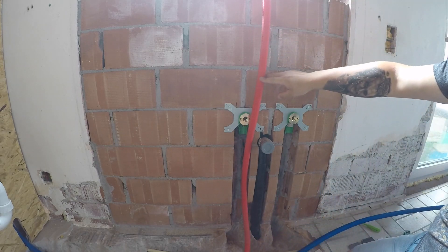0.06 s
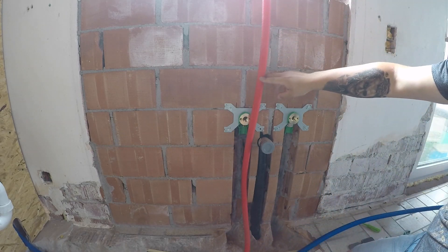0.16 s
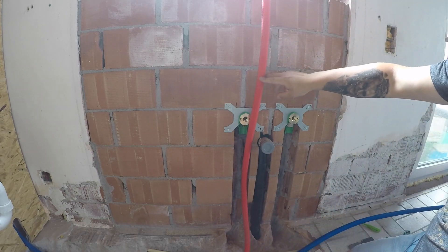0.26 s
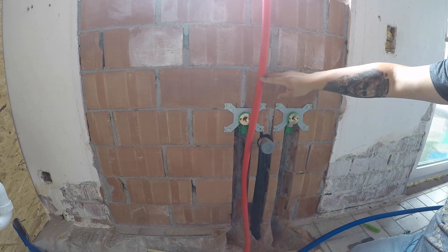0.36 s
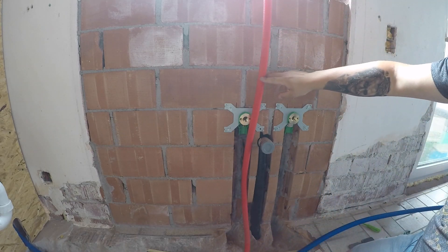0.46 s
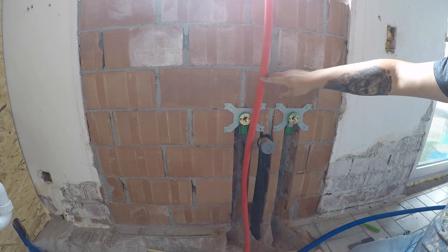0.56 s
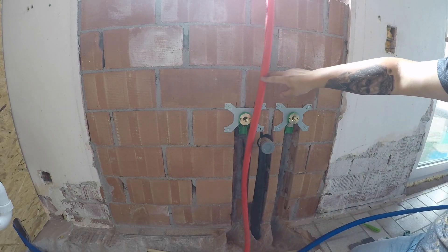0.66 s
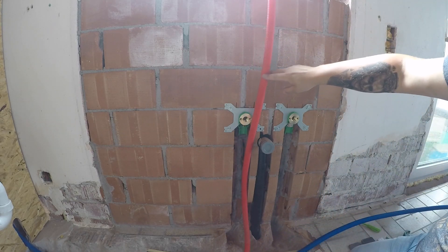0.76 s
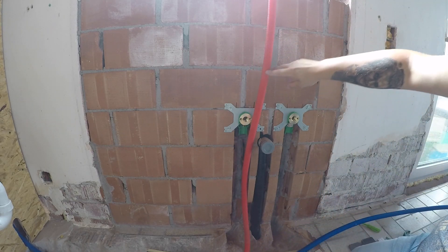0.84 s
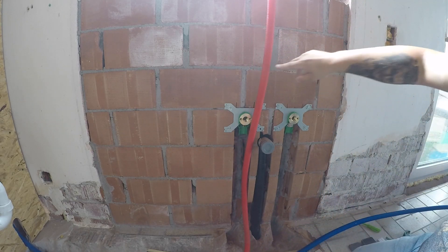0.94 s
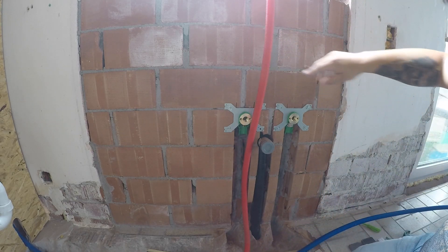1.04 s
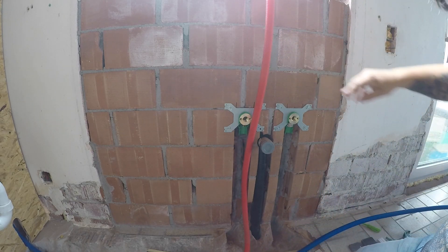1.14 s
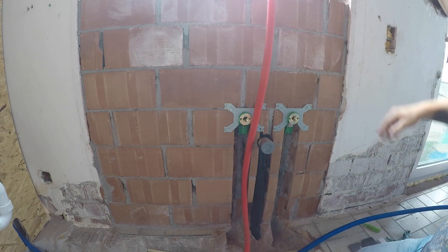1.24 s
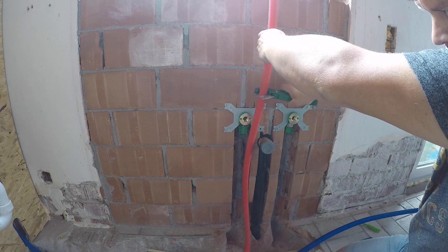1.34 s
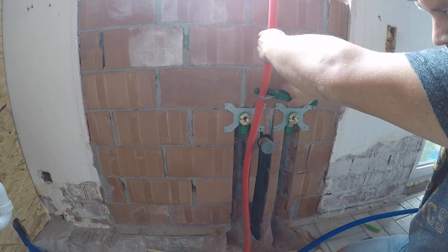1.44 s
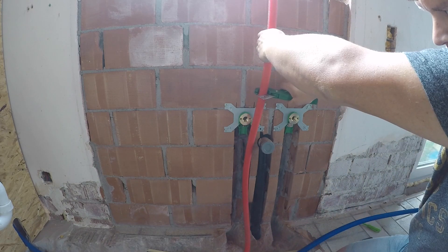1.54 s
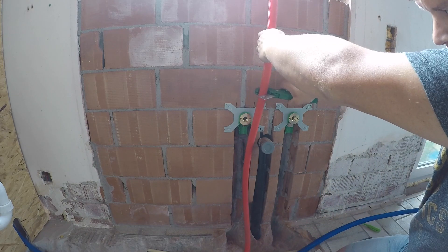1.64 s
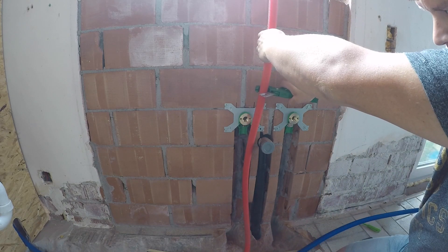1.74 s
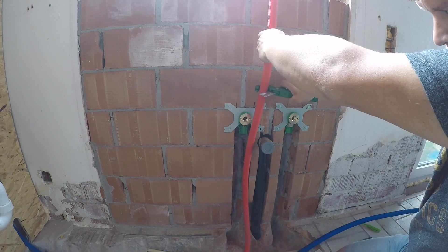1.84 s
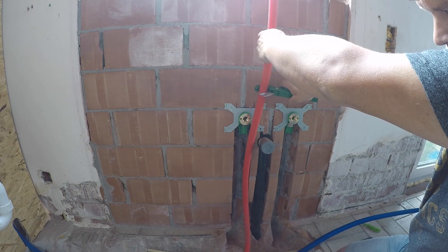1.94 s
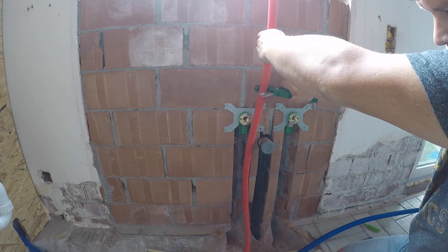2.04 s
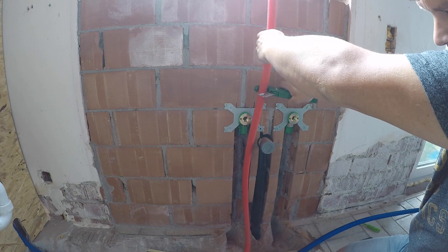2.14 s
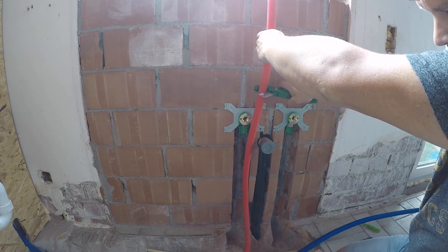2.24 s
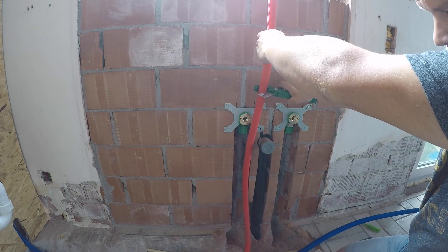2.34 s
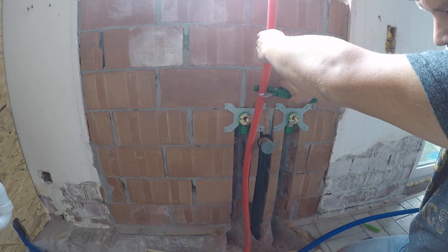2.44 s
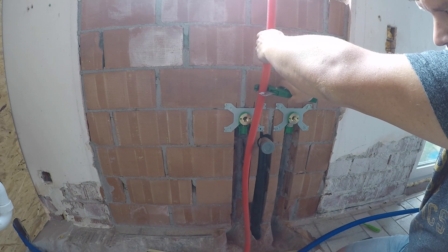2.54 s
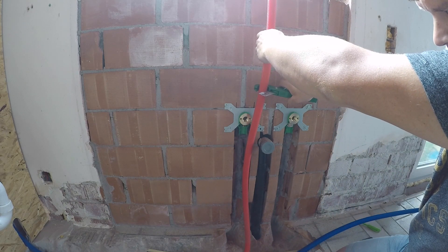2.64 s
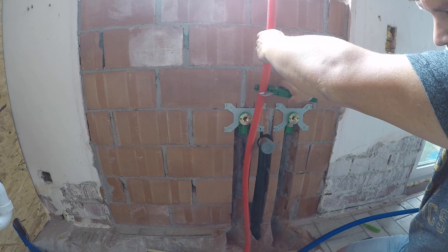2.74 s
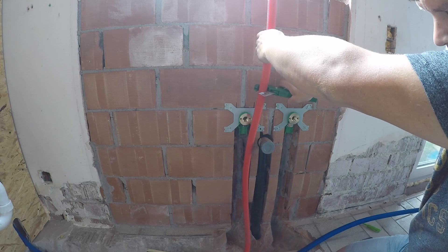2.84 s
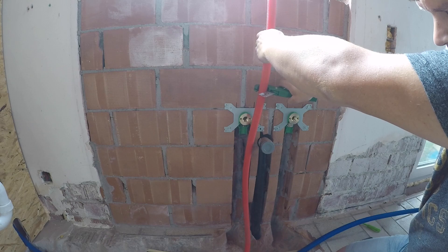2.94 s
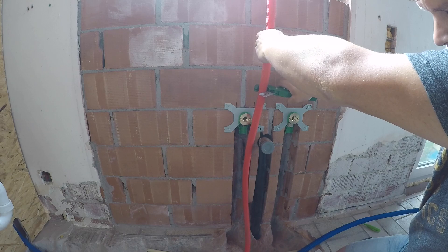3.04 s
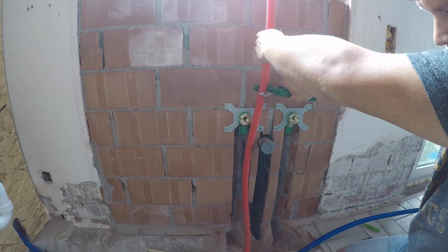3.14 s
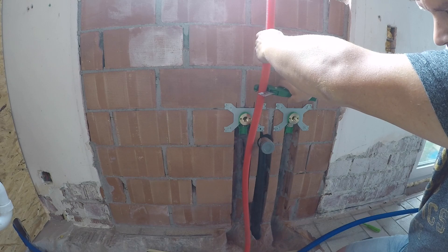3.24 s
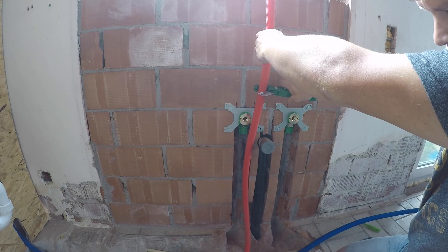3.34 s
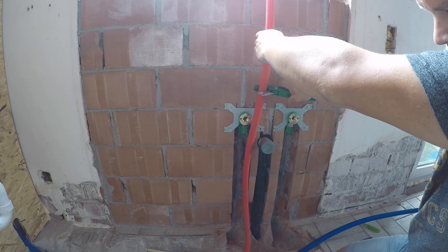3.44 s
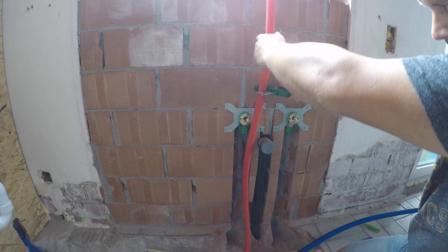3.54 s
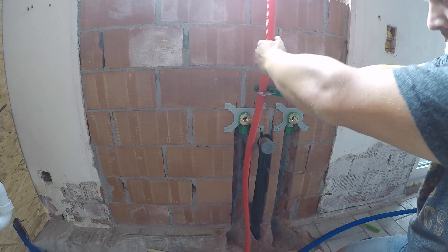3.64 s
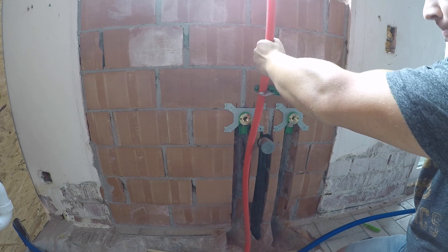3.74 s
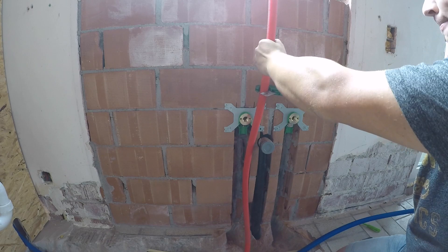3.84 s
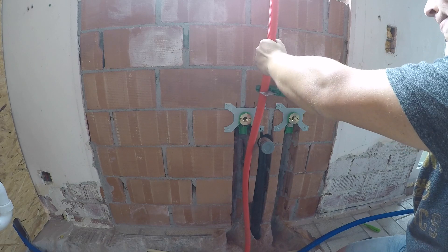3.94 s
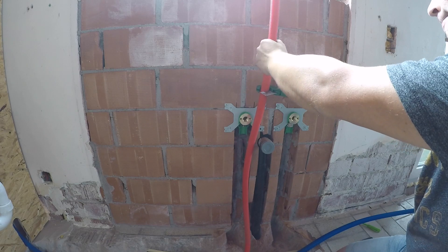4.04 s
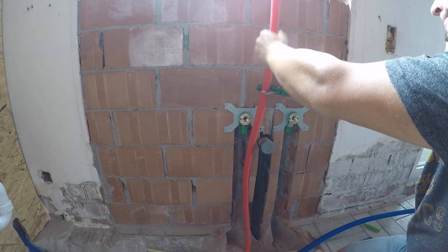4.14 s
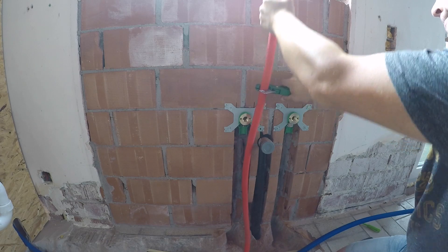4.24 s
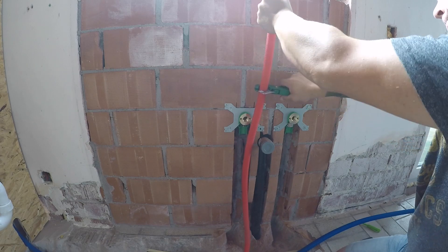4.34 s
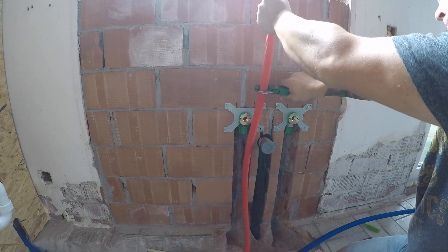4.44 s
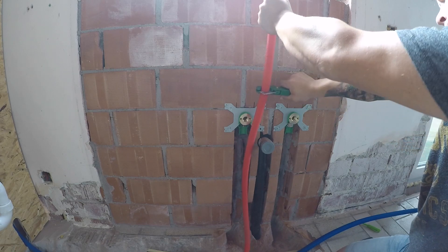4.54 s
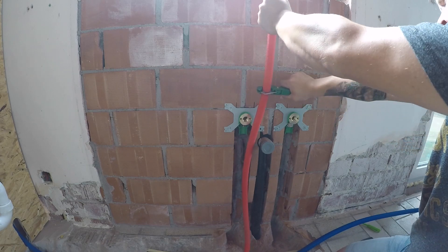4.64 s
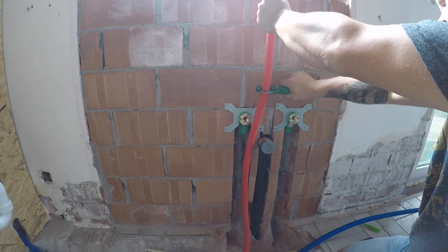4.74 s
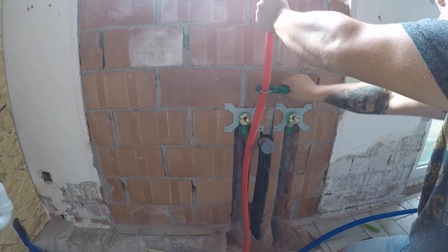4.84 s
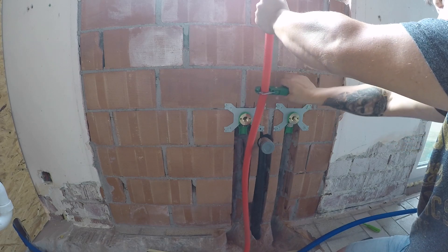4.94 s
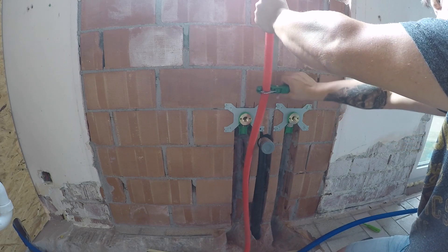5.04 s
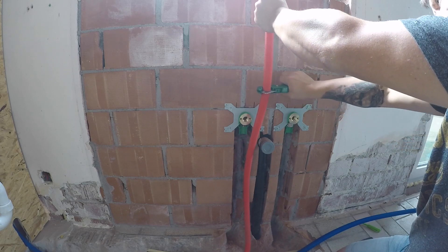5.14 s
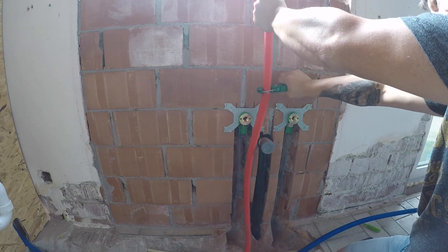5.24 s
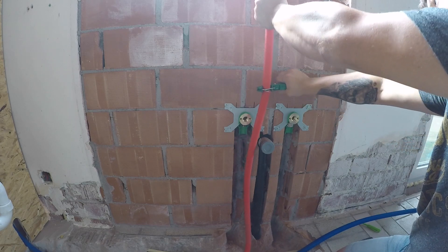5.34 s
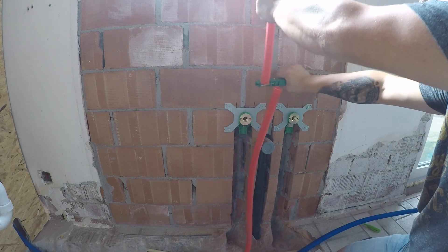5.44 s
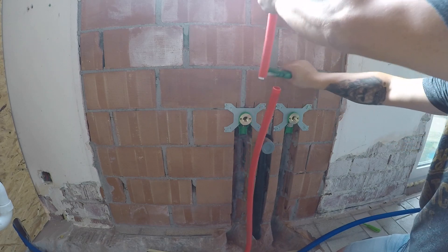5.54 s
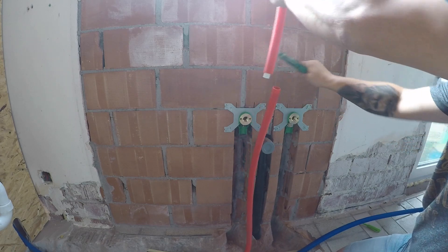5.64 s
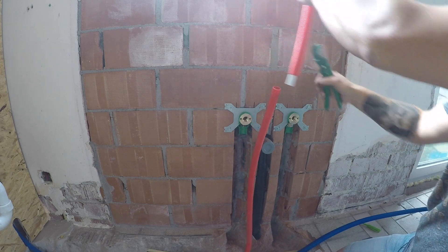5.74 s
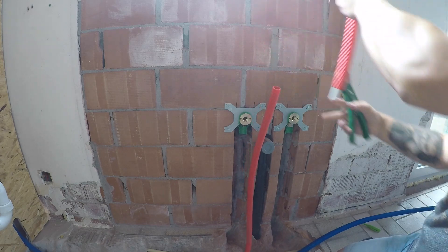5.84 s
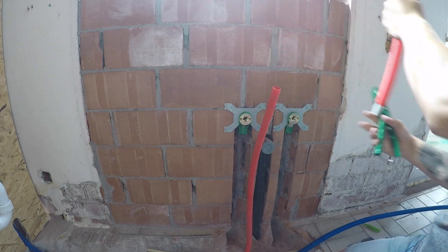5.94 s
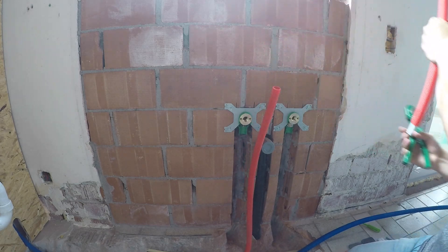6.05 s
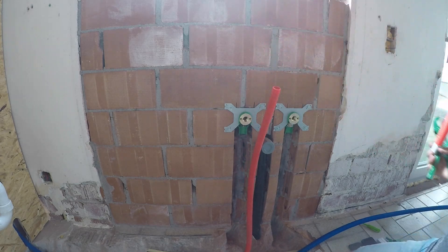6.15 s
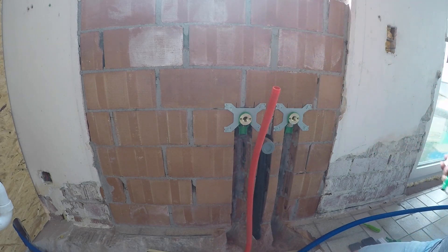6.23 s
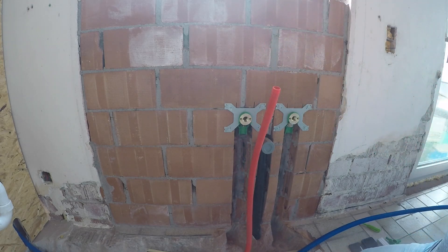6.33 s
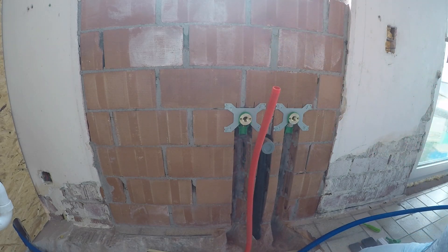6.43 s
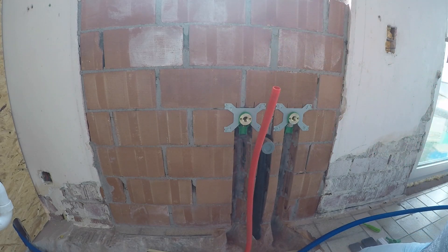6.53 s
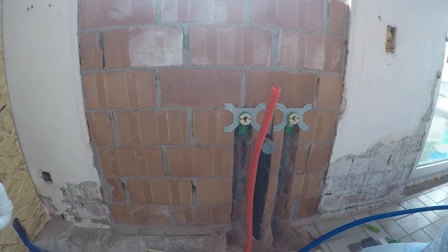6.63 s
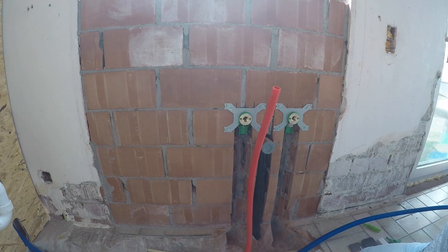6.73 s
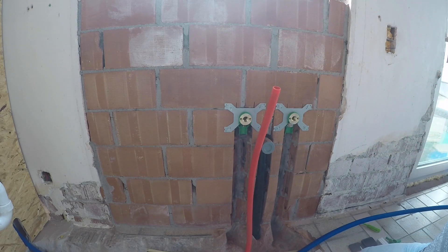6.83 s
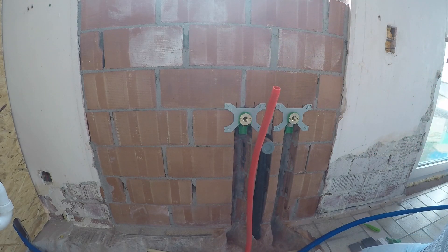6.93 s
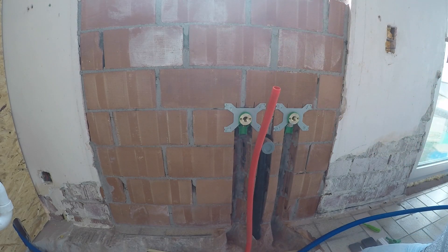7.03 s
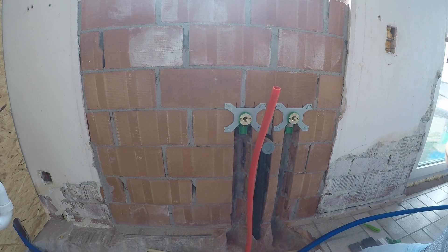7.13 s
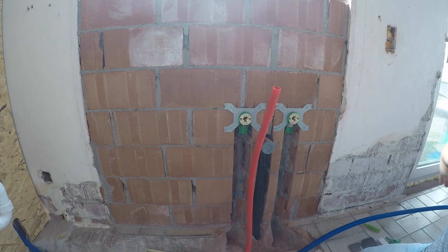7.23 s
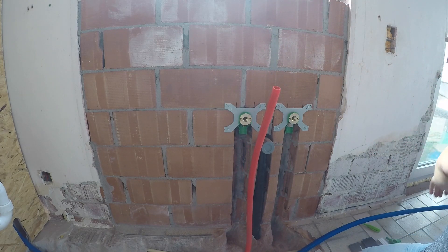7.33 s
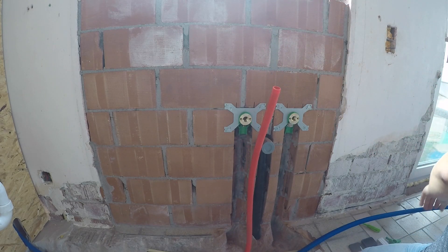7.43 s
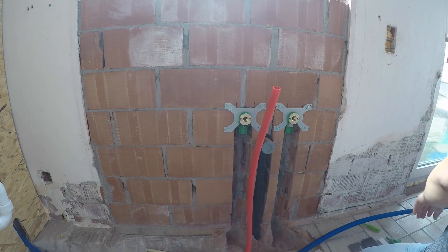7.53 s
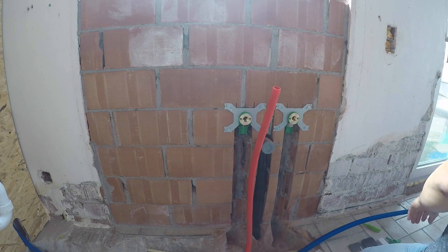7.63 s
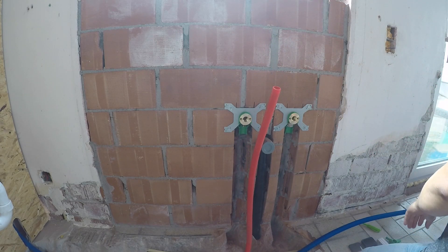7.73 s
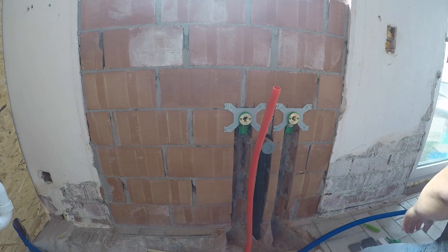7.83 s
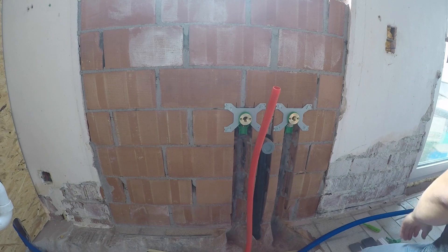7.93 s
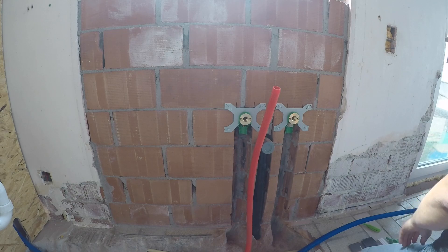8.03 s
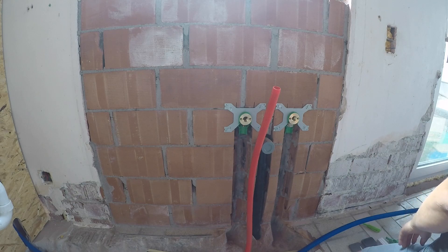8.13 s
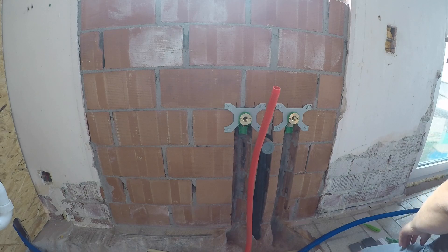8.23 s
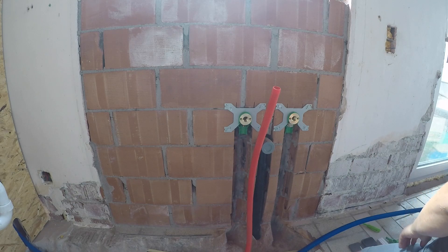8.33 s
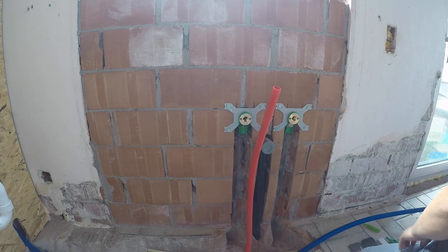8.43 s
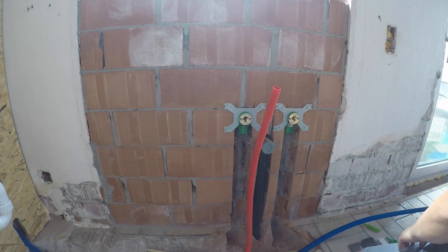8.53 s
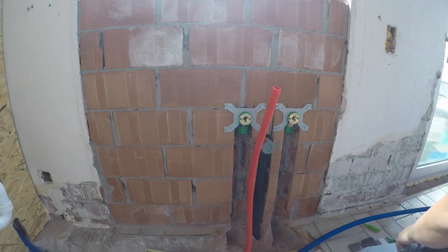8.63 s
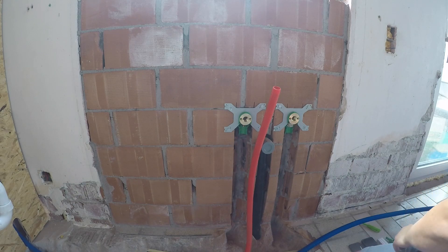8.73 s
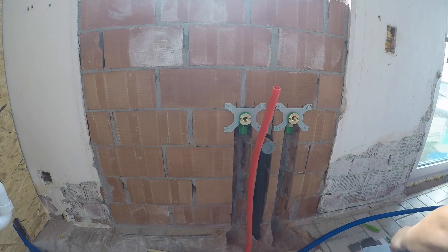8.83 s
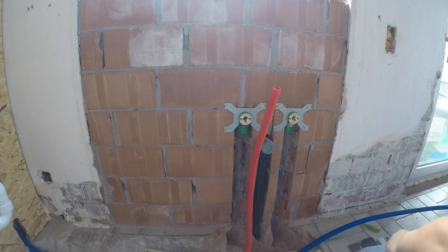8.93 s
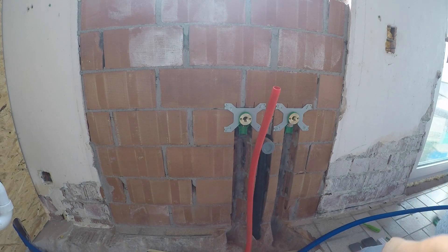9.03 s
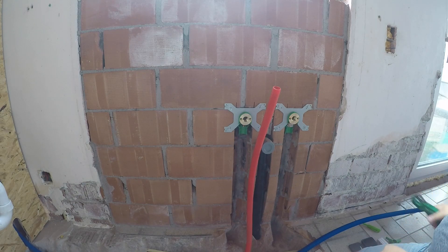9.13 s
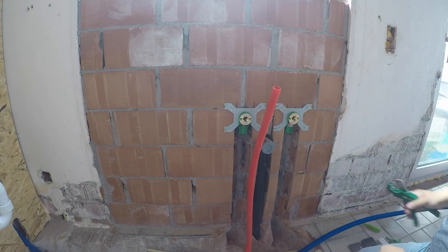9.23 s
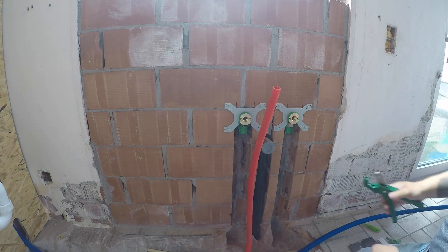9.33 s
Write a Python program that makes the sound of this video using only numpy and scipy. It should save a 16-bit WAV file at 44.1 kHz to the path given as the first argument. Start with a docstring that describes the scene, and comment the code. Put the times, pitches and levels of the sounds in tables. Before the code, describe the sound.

A bare, reverberant room heard close up, with deep faint rumble and steady soft hiss. From 0 to 1.3 s there is only light arm movement, sleeve brushing and tiny ticks on plastic. Between 1.5 and 4 s steel shears click lightly, most brightly at 1.5 and 2.3 s, among dull hollow knocks and small creaks. At 4.2 s a hand slides and the pipe gives a hard hollow knock; a short falling squeak follows at 4.5 s, then tightening creaks. At 5.28 s a very loud, distorted crack rings into the room. The offcut rattles at 5.5 s and is tapped lightly around 5.9-6.3 s. A sharp steel click sounds at 6.8 s. Objects knock on the floor at 7.2 and 7.9-8.1 s, with a tiny rising squeak at 7.7 s. Gritty scrapes and a metallic clack come at 8.2-8.55 s, then shuffling and faint taps until about 9.4 s.

```python
"""A hard, bare-walled room: a plastic pipe is cut with ratchet shears close to the microphone.
Steel ticks, hollow knocks, creaks and squeaks lead to a loud crack and ring; then the offcut rattles against
the wall and is tapped, and things land on the floor. Contacts are sharp impulses with noisy chatter, coloured
by the struck body. Arms, sleeves and sliding are coloured grainy noise, over a deep rumble and a steady hiss."""
import sys
import numpy as np
from scipy import signal
from scipy.fft import rfft, irfft, next_fast_len
from scipy.io import wavfile
from scipy.ndimage import map_coordinates

SR = 44100
rng = np.random.default_rng(int(sys.argv[2]) if len(sys.argv) > 2 else 0)


def wrap_up_sound(samples):
    """Save the sound to the file named by the first command line argument, as 16-bit audio."""
    columns = np.atleast_2d(samples).T
    # keep every value between -1 and 1, then stretch to whole-number steps
    tamed = np.clip(columns, -1, 1)
    steps = np.round(tamed * 32767).astype(np.int16)
    wavfile.write(sys.argv[1], SR, steps)


N = 413658
SIZE = 32768  # samples in one contact or room tail
HZ = np.fft.rfftfreq(SIZE, 1 / SR) + 1  # raised by 1 Hz to keep logarithms finite
AGE = np.arange(SIZE) / SR  # seconds since a contact
TIME = np.arange(N) / SR  # seconds since the scene began

# Background. Colours of the deep rumble and the room and microphone hiss: pitch_hz, level_db
RUMBLE_COLOUR = [(5, -6.5), (14, 7), (30, -5.5), (45, -10.5), (70, -22), (150, -47), (600, -82)]
HISS_COLOUR = [(100, 3.5), (420, -7), (1200, -14), (3000, -23), (8000, -22), (15500, -25)]
# Slow level curve of the rumble: time_s, level_db
RUMBLE_LEVEL = [(0, -52), (1.4, -46.5), (1.9, -57), (4.4, -44), (5.6, -47.5), (6.37, -39.5), (7.2, -53.5),
                (9.38, -49)]
# How long the bare room rings in each band: pitch_hz, t60_s
ROOM_DECAY = [(100, 0.16), (300, 0.57), (700, 0.42), (1800, 0.54), (5000, 0.43), (9000, 0.36),
              (14000, 0.12)]

# How briskly the arms move and how much the sleeves brush: time_s, effort_db, sleeve_db
EFFORT_CURVE = [(0, -74.5, -84), (.55, -72, -76), (.75, -70.5, -71), (1.05, -63.5, -73), (1.25, -72, -74),
                (1.62, -68, -74), (2.1, -72.5, -94), (2.45, -82, -82), (3.3, -79, -88), (3.7, -69.5, -72.5),
                (4.1, -68.5, -79), (4.55, -62, -71), (5.25, -71.5, -80), (6.42, -64.5, -67.5),
                (6.72, -70.5, -73), (7.151, -61, -70), (7.75, -73.5, -88), (8.4, -61.5, -62),
                (9.38, -65.5, -74)]
# Colours of arm movement, rubbing and brushing sleeves: pitch_hz, level_db
ARM_COLOUR = [(30, -7), (70, 4), (150, -5.5), (250, -3), (400, 0), (600, -7.5), (1200, -22.5),
              (5000, -65.5)]
RUB_COLOUR = [(250, -12.5), (550, -1), (1100, -1.5), (1700, -9), (2400, -8), (3500, -11), (6000, -22),
              (15000, -36)]
SLEEVE_COLOUR = [(300, -26.5), (1200, -6.5), (2500, -12.5), (4300, -6), (5600, -6.5), (7300, -1.5),
                 (10000, -7), (15000, -13.5)]
# Colours of swishing cloth, grit underneath and a sole on the floor: pitch_hz, level_db
SWISH_COLOUR = [(300, -22.5), (1200, -8), (2500, -13), (4300, -9), (5600, -7), (7500, 1), (10000, -6.5),
                (15000, -13.5)]
GRIT_COLOUR = [(100, -20), (300, -16), (550, 3), (1500, -1), (3000, -2.5), (5500, -4), (9000, -11.5),
               (15000, -22.5)]
SOLE_COLOUR = [(150, -11), (500, 3), (1200, -4.5), (2600, -4), (4900, -3), (5800, -11), (9000, -24),
               (15000, -37)]
# Grip tightening, sleeve and cloth swishes, dragging over grit: middle_s, level_db, half_length_s
GRIP_STROKES = [(3.79, -62, 0.024), (4.5, -67, 0.02), (4.86, -60, 0.016), (5.0, -60, .02),
                (5.06, -57.5, 0.0088), (5.15, -58, 0.015), (7.16, -61, 0.016), (9.24, -63, 0.026)]
SWISH_STROKES = [(3.58, -56, 0.048), (3.8, -64.5, 0.052), (4.19, -47, 0.023), (4.26, -44, 0.021),
                 (4.56, -61, 0.049), (4.97, -66, .05), (6.088, -53.5, .008), (6.45, -61.5, 0.12)]
SCRAPE_STROKES = [(8.258, -37.5, 0.017), (8.35, -51.5, 0.043), (8.51, -37, 0.018), (8.545, -36, 0.02)]

# Things set down on the floor: start_s, level_db, brightness_db_per_octave, body_hz, body_db
FLOOR_DROPS = [(7.2146, 5, 1.5, 562, 9.5), (7.231, 0.5, -2, 164, 9.5), (7.887, 3.5, 0, 1087, 14.5),
               (7.896, 2.5, -.5, 314, 11), (8.054, -6.5, -1, 323, 12), (8.067, -1.5, -.5, 315, 26),
               (8.122, -6.5, 1.5, 340, -8), (8.237, -4.5, 2.5, 1220, 6), (8.412, -17.5, 2, 1490, 4),
               (8.5296, -6.5, 2, 1280, 5), (8.658, -23, -1.5, 160, 12), (8.876, -20, 0.5, 600, 5),
               (9.017, -25.5, 2.5, 1545, 18), (9.164, -15.5, -1.5, 600, 10.5)]
# Colour of the floor contacts: pitch_hz, level_db
FLOOR_COLOUR = [(50, -37), (110, -6), (170, -3.5), (500, 4.5), (1500, -1.5), (2800, -11), (5000, -9.5),
                (9000, -19), (15000, -29.5)]

# Shears tapping the loose offcut: start_s, level_db, brightness_db_per_octave
OFFCUT_TAPS = [(5.938, -11.5, -2.5), (5.943, -17.5, -4), (5.978, -13.5, -2), (6.055, -23, 0.5),
               (6.206, -16.5, -1), (6.274, -20.5, -4.5), (6.778, -27.5, 1.5), (6.847, -13.5, 0.5)]
# Modes of the loose offcut: pitch_hz, width_hz, level_db
OFFCUT_MODES = [(852, 98, 0), (1356, 78, -2), (1650, 64, -11.5), (2280, 65, 3.5), (3540, 58, -7),
                (6750, 45, -5), (8450, 150, -14)]

# Skin and soles squeaking on plastic: start_s, length_s, first_hz, last_hz, level_db
SQUEAK_GLIDES = [(4.524, 0.095, 2220, 1474, -53.5), (7.688, 0.0334, 1770, 2700, -56)]
# Runs of small contacts on the plastic: the pipe creaking in the grip, small knocks,
# and at 5.48 s the offcut rattling against the wall:
# start_s, length_s, contact_db, contacts_per_s, brightness_db_per_octave
CONTACT_RUNS = [(.66, .2, -43.5, 87, 4.5), (1.501, .17, -48, 34, 6), (2.531, .04, -35, 106, -6),
                (2.95, .05, -39, 77, -5), (3.505, .14, -32.5, 90, -6.5), (3.726, .14, -34.5, 114, -2),
                (3.903, .24, -34, 51, -0.5), (4.957, .12, -33.5, 130, -1.5), (5.119, .055, -34, 260, -4.5),
                (5.482, .05, -14, 140, -6.5), (5.811, .12, -34.5, 45, 5), (6.347, .27, -35, 70, 3)]
# Hollow knocks of the pipe in the hand: start_s, level_db, brightness_db_per_octave
PIPE_KNOCKS = [(.591, -30.5, 2), (1.577, -24, -4), (1.7395, -16.5, -5.5), (1.753, -15, -3.5),
               (1.797, -22.5, -7), (2.138, -32, -3), (2.571, -26.5, -2), (2.649, -34.5, -9),
               (3.005, -24.5, -6.5), (3.126, -27.5, -3), (3.513, -22, -5), (3.698, -25, -8),
               (4.008, -25, -1.5), (4.178, -6, 1.5), (4.1927, 9.5, 0), (4.196, 0.5, -0.5), (4.205, -3, 1),
               (4.268, -14, 1.5), (4.778, -27.5, -5.5), (4.863, -26.5, 2), (5.876, -26, -4.5),
               (6.146, -29, -5), (6.465, -21.5, 1), (6.548, -30, -7.5)]
# Colour of the hollow pipe: pitch_hz, level_db
PIPE_COLOUR = [(50, -24), (200, -20.5), (520, -6), (800, 3.5), (1200, -0.5), (1750, -7.5), (3000, -14.5),
               (8000, -26.5), (16000, -35.5)]
# Soft bumps of arm and pipe against wall and floor: start_s, level_db, pitch_hz
SOFT_BUMPS = [(.67, -26, 80), (0.783, -22, 99), (0.827, -26.5, 110), (1.34, -23, 39.6), (1.551, -23.5, 80),
              (2.051, -18.5, 75), (3.56, -24.5, 75), (4.193, -12.5, 140), (5.054, -26.5, 300),
              (5.275, 0, 140), (5.82, -24, 99), (6.055, -15.5, 142), (6.363, -7, 36.6), (7.218, -10, 169.5),
              (8.24, -17, 140)]

# Steel clicks of the shears: start_s, level_db, pitch_hz, ring_amount (0-1)
SHEAR_CLICKS = [(1.4758, -17.5, 8400, 0.6), (1.7397, -25, 7200, 0.3), (1.755, -22.5, 7140, .1),
                (2.001, -23.5, 6660, 0.03), (2.272, -12.5, 9230, .76), (2.761, -41.5, 6300, .6),
                (2.914, -22.5, 6900, 0.4), (3.354, -22.5, 6700, .1), (3.738, -33, 7970, .2),
                (4.842, -28.5, 7740, .2), (4.929, -32.5, 8900, 0.3), (4.984, -33.5, 8120, .2),
                (6.272, -22, 7000, 0.2), (6.3237, -26, 5830, 0.4), (6.806, 3.5, 5860, 0.2),
                (6.847, -11, 4700, 0.09), (8.122, -15.5, 4630, 0.4), (8.5279, -2.5, 4840, 0.8),
                (8.802, -26, 7040, .6), (9.018, -25.5, 7300, 0.94)]
# Modes of the steel shears: pitch_hz, width_hz, level_db
STEEL_MODES = [(3230, 100, 8), (4100, 230, 17), (4540, 33, 18), (5050, 46, 16), (5960, 30, -7),
               (6920, 30, 14.5), (7700, 50, 6), (9030, 64, 9), (9670, 53, 11), (13100, 70, -1)]
# Colour of the breaking crack: pitch_hz, level_db
CRACK_COLOUR = [(40, -19.5), (150, -18), (500, -9), (1200, -0.5), (2300, 1.5), (2900, -9), (8000, -3.5),
                (11000, -7), (16000, -11.5)]
# Modes of the ringing cut pipe, before the snap squares their gain: pitch_hz, width_hz, level_db
CUT_PIPE_MODES = [(1762, 130, 1), (3640, 410, -3.5), (5633, 290, -1.5), (9360, 420, -4),
                  (13300, 2200, -13.5)]


def amp(db):
    """Decibels to gain."""
    return 10 ** (np.asarray(db) / 20)


def along(points, hz):
    """Read a curve of (pitch_hz, value) points on a log pitch axis."""
    pitches, values = np.transpose(points)
    return np.interp(np.log(hz + 1), np.log(pitches + 1), values)


def norm(x):
    """Scale a sound to energy 1."""
    return x / np.sqrt(np.sum(x ** 2) + 1e-20)


def add(track, start_s, sound):
    """Mix a sound into the track, cut off at the track's end."""
    part = track[max(round(start_s * SR), 0):][:len(sound)]
    part += sound[:len(part)]


def hump(hz, octaves):
    """Gain of one broad resonance."""
    return 1 / (1 + (np.log2(HZ / hz) / octaves) ** 2)


def resonances(modes):
    """Gain of a set of modes, summed as power."""
    power = sum(amp(2 * db) / (1 + ((HZ - hz) / width) ** 2) for hz, width, db in modes)
    return np.sqrt(power)


def tilt(bright):
    """Gain sloping by bright dB an octave, 0 dB near 1 kHz and flat below 200 Hz."""
    return amp(bright * np.log2(np.maximum(HZ, 200) / 1000))


def response(gain):
    """Causal minimum-phase spectrum with this gain, so a struck body sounds only after the contact."""
    cepstrum = irfft(np.log(np.maximum(gain, 1e-6)))
    # fold the backward half onto the forward half
    cepstrum[1:SIZE // 2] *= 2
    cepstrum[SIZE // 2 + 1:] = 0
    return np.exp(rfft(cepstrum))


def burst(t60):
    """Noise of energy 1 that dies away by 60 dB in t60 seconds."""
    return norm(rng.standard_normal(SIZE) * amp(-60 * AGE / t60))


def room_tail(build=0.002):
    """Bare walls: diffuse noise builds up quickly, then each frequency dies at its own speed."""
    hz, t, bands = signal.stft(rng.standard_normal(SIZE), SR, nperseg=256)
    decay = amp(-60 * t / along(ROOM_DECAY, hz)[:, None])
    tail = signal.istft(bands * decay, SR, nperseg=256)[1][:SIZE]
    return norm(tail * (1 - np.exp(-AGE / build)))


def strike(gain, chatter_t60, chatter_db, room_db):
    """A sharp contact and its brief chatter, coloured by the struck body, then the room."""
    contact = amp(chatter_db) * burst(chatter_t60)
    contact[0] += 1
    direct, tail = irfft(rfft([contact, room_tail()]) * response(gain))
    return norm(direct) + amp(room_db) * norm(tail)


def wobble(rate):
    """A smooth random curve with rate knots a second."""
    knots = rng.standard_normal(int(N * rate / SR) + 4)
    return map_coordinates(knots, [TIME * rate])


def friction(colour, grain_db):
    """Rubbing: tiny slips of uneven size make coloured noise of rms 1."""
    slips = rng.standard_normal(N) * amp(grain_db * wobble(rate=400))
    m = next_fast_len(N + SIZE)
    gain = amp(along(colour, np.fft.rfftfreq(m, 1 / SR)))
    rubbed = irfft(rfft(slips, m) * gain, m)[:N]
    return norm(rubbed) * np.sqrt(N)


def strokes(rows):
    """Gain of strokes that each swell and fade like a bell curve."""
    return sum(amp(db) * np.exp(-.5 * ((TIME - s) / half) ** 2) for s, db, half in rows)


def effort():
    """Gains of arm effort and sleeve brushing, glided between points in dB."""
    s, *levels = np.transpose(EFFORT_CURVE)
    return [amp(np.interp(TIME, s, db)) for db in levels]


def rumble():
    """Deep coloured noise swells slowly at the microphone."""
    return amp(np.interp(TIME, *np.transpose(RUMBLE_LEVEL))) * friction(RUMBLE_COLOUR, grain_db=0)


def hiss():
    """Still room and microphone noise: a steady hiss without grain."""
    return amp(-71.0) * friction(HISS_COLOUR, grain_db=0.0)


def handling():
    """Friction: effort drives arms and rubbing; single strokes grip, swish, scrape or shuffle."""
    arm_db, rub_db = 4.5, -3  # over the effort
    moving, brushing = effort()
    near = amp(arm_db) * moving * friction(ARM_COLOUR, grain_db=1.5)
    rubbing = amp(rub_db) * moving + strokes(GRIP_STROKES)
    near += rubbing * friction(RUB_COLOUR, grain_db=2.5)
    near += brushing * friction(SLEEVE_COLOUR, grain_db=3.5)
    near += strokes(SWISH_STROKES) * friction(SWISH_COLOUR, grain_db=3.0)
    near += strokes(SCRAPE_STROKES) * friction(GRIT_COLOUR, grain_db=3.0)
    # one long, uneven shuffle on the floor: middle_s, level_db, half_length_s
    shuffle = strokes([(8.83, -52.5, 0.15)]) * amp(1.1 * wobble(rate=30))
    near += shuffle * friction(SOLE_COLOUR, grain_db=2)
    return near + amp(-11) * signal.fftconvolve(near, room_tail())[:N]


def finger_ticks():
    """Tiny random contacts on the plastic, stronger when the arms move more."""
    ticks_per_s, tick_db, spread_db = 22, 21.5, 4.5  # tick_db is over the effort
    contacts = rng.random(N) < ticks_per_s / SR
    sizes = effort()[0] * amp(tick_db + spread_db * rng.standard_normal(N))
    plastic = amp(along(PIPE_COLOUR, HZ)) * tilt(bright=3.1)
    tick = strike(plastic, chatter_t60=0.013, chatter_db=2.5, room_db=-12.0)
    return signal.fftconvolve(contacts * sizes, tick)[:N]


def floor_knocks():
    """Things land farther off, with much room, a short clatter and a body note each."""
    out = np.zeros(N)
    for s, db, bright, hz, body_db in FLOOR_DROPS:
        body = body_db * hump(hz, 0.13)
        colour = amp(along(FLOOR_COLOUR, HZ) + body) * tilt(bright)
        add(out, s, amp(db) * strike(colour, chatter_t60=0.1, chatter_db=12.5, room_db=-2.5))
    return out


def offcut():
    """The short length of pipe rings at the shears' touch; its modes vary from tap to tap."""
    out = np.zeros(N)
    for s, db, bright in OFFCUT_TAPS:
        # the place of contact weights the modes
        modes = [(hz * (1 + rng.normal(0, .015)), width, level + rng.normal(0, 2.5))
                 for hz, width, level in OFFCUT_MODES]
        tube = (resonances(modes) + amp(-11.5) * hump(2900, 1.34)) * tilt(bright)
        add(out, s, amp(db) * strike(tube, chatter_t60=0.041, chatter_db=8, room_db=-7.0))
    return out


def squeaks():
    """Skin and soles on plastic: a jittery tone bends ever faster as the sliding speed changes."""
    out = np.zeros(N)
    for start, length, first_hz, last_hz, db in SQUEAK_GLIDES:
        progress = np.clip(AGE / length, 0, 1)
        jitter = map_coordinates(rng.standard_normal(SIZE), [AGE * 600], order=1)
        glide = first_hz + (last_hz - first_hz) * progress ** 3
        pitch = glide * (1 + .08 * jitter)
        tone = np.sin(2 * np.pi * np.cumsum(pitch) / SR)
        add(out, start, amp(db) * np.sin(np.pi * progress) * tone)
    return out + amp(-15.0) * signal.fftconvolve(out, room_tail())[:N]


def contact_runs():
    """Creaks, small knocks and the offcut's rattle: contacts uneven in timing and size excite the plastic."""
    out = np.zeros(N)
    most_contacts = 40  # in one run
    for start, length, db, rate, bright in CONTACT_RUNS:
        contacts = np.zeros(SIZE)
        ages = np.cumsum(rng.exponential(1 / rate, most_contacts))
        directions = rng.choice([-1, 1], most_contacts)
        sizes = amp(db + rng.normal(0, 1.4, most_contacts)) * directions
        places = np.clip(ages * SR, 0, SIZE - 1).astype(int)
        contacts[places] = sizes * (ages < length)
        plastic = amp(along(PIPE_COLOUR, HZ)) * tilt(bright)
        contact_sound = strike(plastic, chatter_t60=0.014, chatter_db=-2, room_db=-13.5)
        add(out, start, signal.fftconvolve(contacts, contact_sound))
    return out


def soft_bumps():
    """Arm and pipe bump wall and floor: a soft contact excites one broad hump."""
    out = np.zeros(N)
    for s, db, hz in SOFT_BUMPS:
        thud = hump(hz, 1.6) ** 2
        add(out, s, amp(db) * strike(thud, chatter_t60=0.058, chatter_db=-4.0, room_db=-10.0))
    return out


def pipe_knocks():
    """The pipe knocks in the hand: short contacts take on its hollow colour."""
    out = np.zeros(N)
    for s, db, bright in PIPE_KNOCKS:
        plastic = amp(along(PIPE_COLOUR, HZ)) * tilt(bright)
        add(out, s, amp(db) * strike(plastic, chatter_t60=0.041, chatter_db=6, room_db=-11))
    return out


def shears():
    """The pawl drops over the ratchet teeth and rings the steel; the handle adds a faint low knock."""
    out = np.zeros(N)
    handle = amp(-11.0) * hump(780, 1.27)
    treble_loss = np.hypot(1, (HZ / 12000) ** 5)
    for s, db, hz, ring_amount in SHEAR_CLICKS:
        # the grip shifts and damps the modes a little from click to click
        grip = 1 + rng.normal(0, .012)
        modes = [(f * grip, width, level + rng.normal(0, 2)) for f, width, level in STEEL_MODES]
        ring = np.hypot(1, ring_amount * resonances(modes))
        steel = hump(hz, octaves=0.46) * ring / treble_loss
        add(out, s, amp(db) * strike(steel + handle, chatter_t60=0.027, chatter_db=4.0, room_db=-12))
    return out


def snap():
    """The blade breaks through: a broad crack, and the freed pipe wall rings into the room."""
    out = np.zeros(N)
    crack = amp(along(CRACK_COLOUR, HZ))
    wall = resonances(CUT_PIPE_MODES) ** 2  # squared: sharp peaks with dark valleys between them
    add(out, 5.2772, amp(18.0) * strike(crack, chatter_t60=0.11, chatter_db=12.5, room_db=-0.5))
    add(out, 5.2775, amp(18) * strike(wall, chatter_t60=0.51, chatter_db=12, room_db=2.0))
    return out


def scene():
    """All sources at one microphone."""
    background = rumble() + hiss()
    movement = handling() + finger_ticks()
    contacts = floor_knocks() + offcut() + soft_bumps()
    pipe = squeaks() + contact_runs() + pipe_knocks()
    cutting = shears() + snap()
    return (background + movement + contacts + pipe + cutting)[None]


def record(dry, top=0.64):
    """The loudest peaks overload the microphone, levelling off at top; a steep filter ends the treble."""
    top_hz = 15900
    clipped = dry / (1 + (dry / top) ** 8) ** (1 / 8)
    m = next_fast_len(N + SIZE)
    band = 1 / (1 + (np.fft.rfftfreq(m, 1 / SR) / top_hz) ** 120)
    return irfft(rfft(clipped, m) * band, m)[..., :N]


dry = scene()
out = record(dry)
wrap_up_sound(out)
```